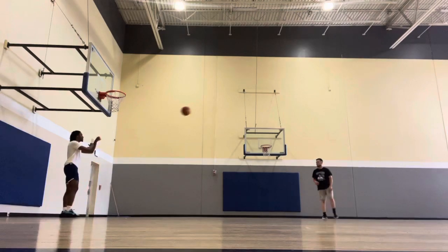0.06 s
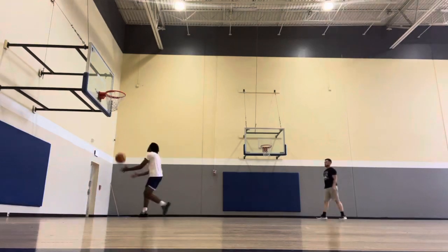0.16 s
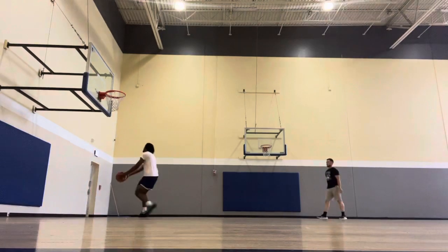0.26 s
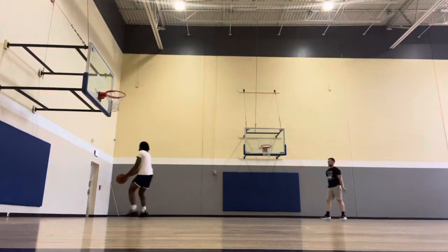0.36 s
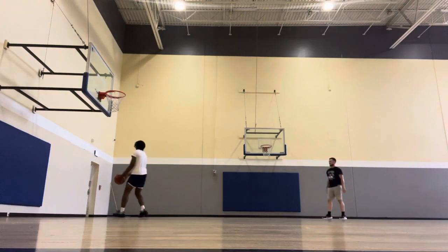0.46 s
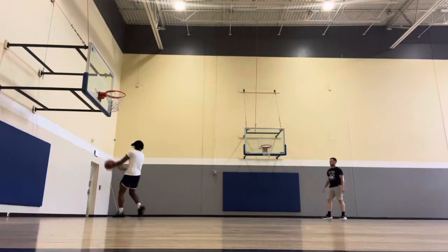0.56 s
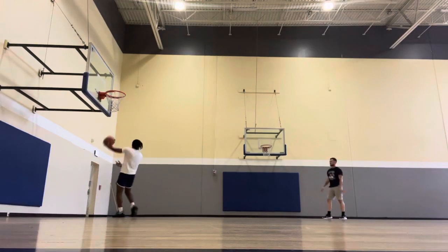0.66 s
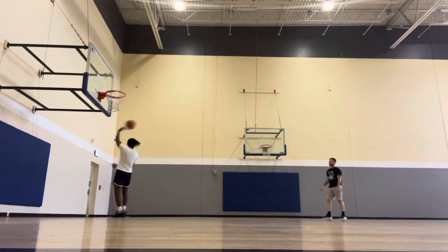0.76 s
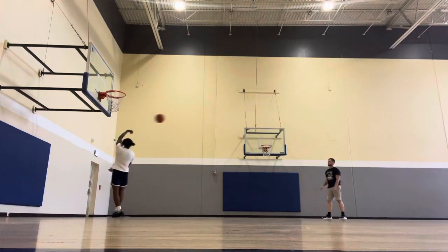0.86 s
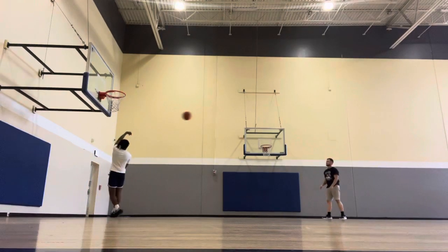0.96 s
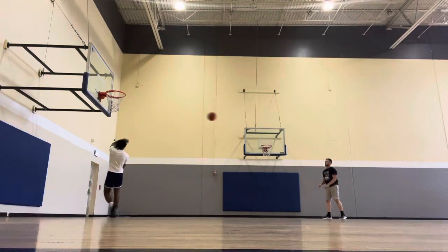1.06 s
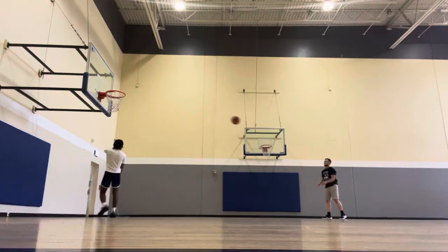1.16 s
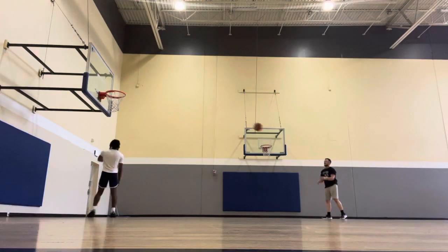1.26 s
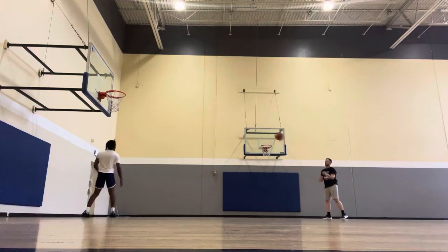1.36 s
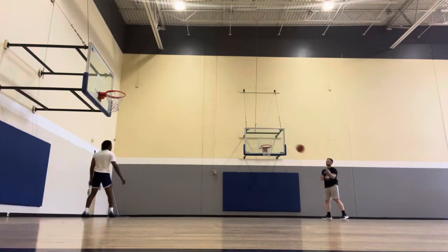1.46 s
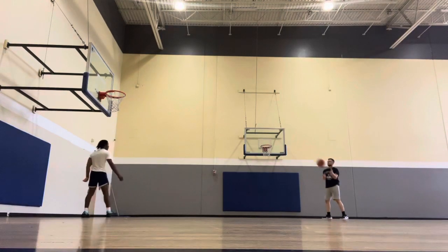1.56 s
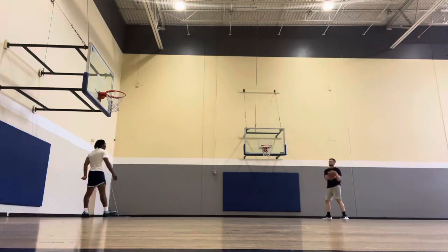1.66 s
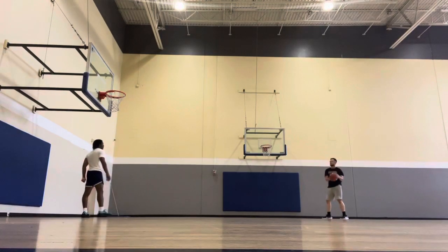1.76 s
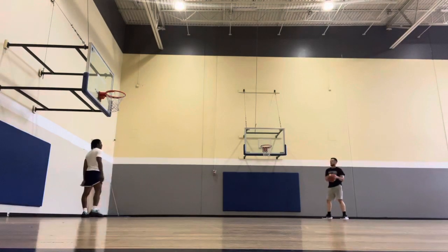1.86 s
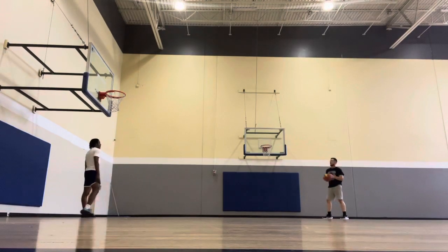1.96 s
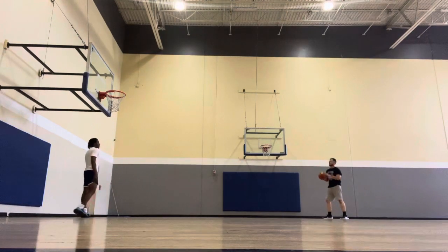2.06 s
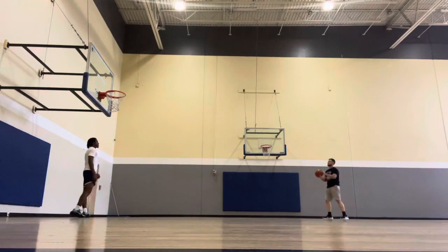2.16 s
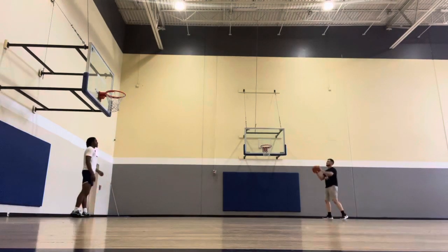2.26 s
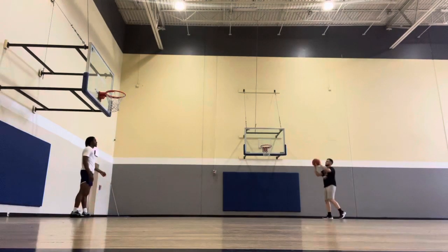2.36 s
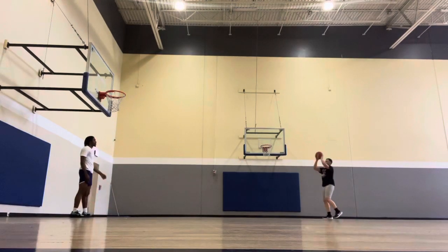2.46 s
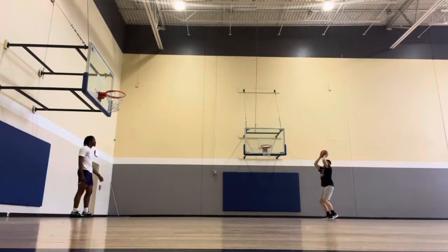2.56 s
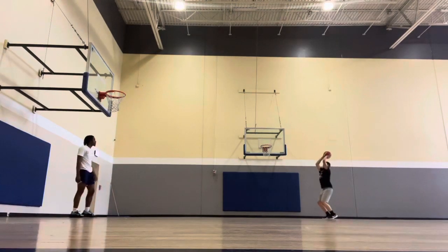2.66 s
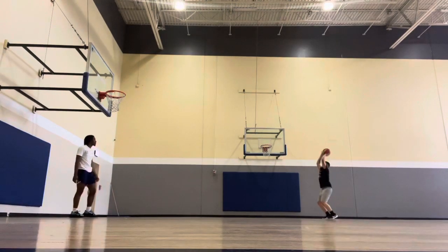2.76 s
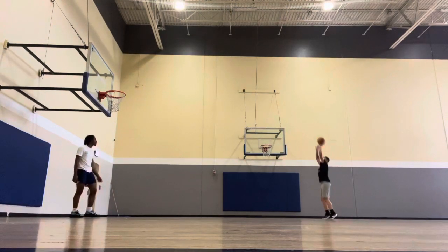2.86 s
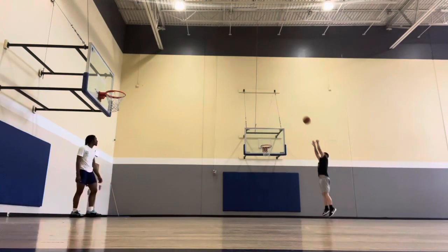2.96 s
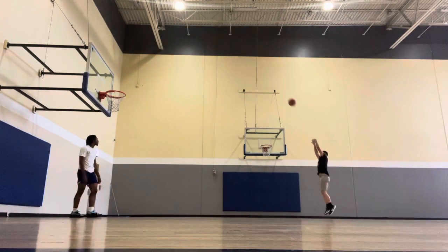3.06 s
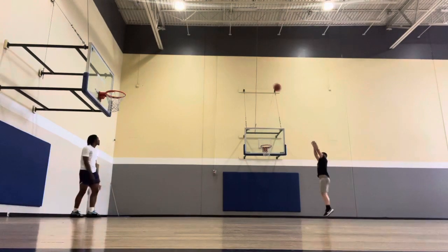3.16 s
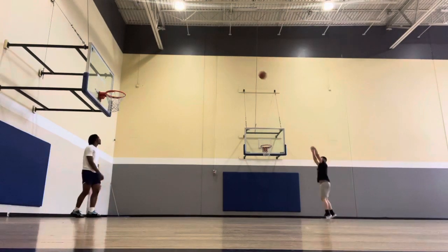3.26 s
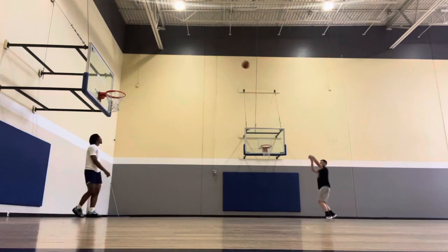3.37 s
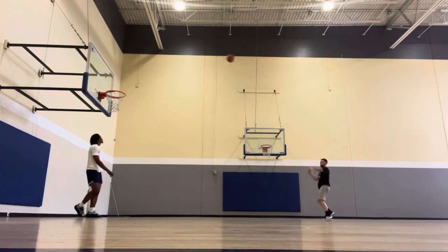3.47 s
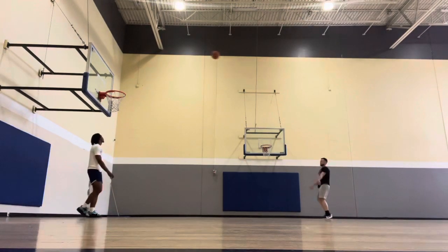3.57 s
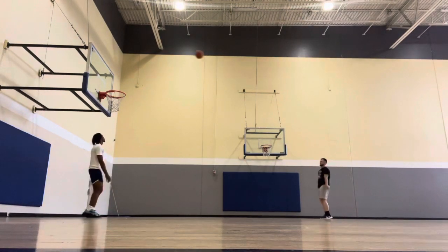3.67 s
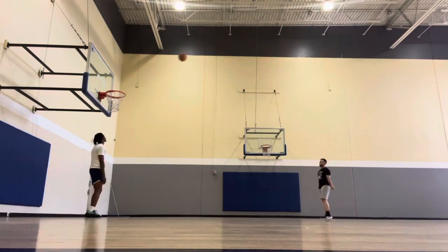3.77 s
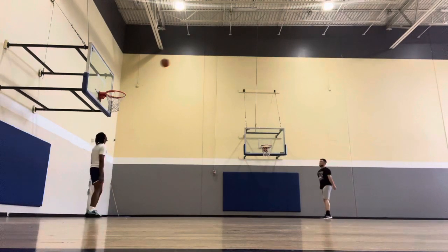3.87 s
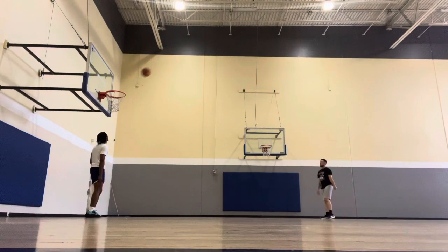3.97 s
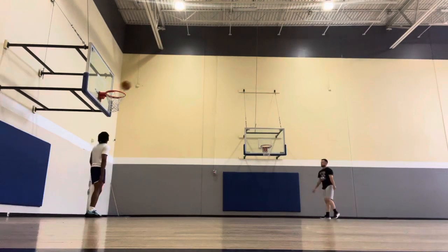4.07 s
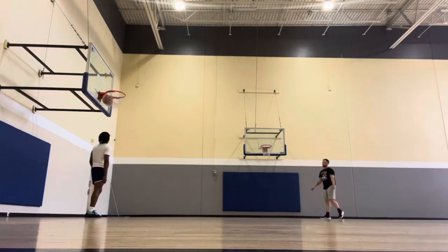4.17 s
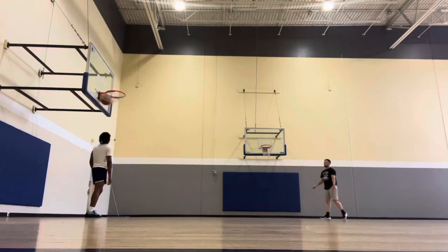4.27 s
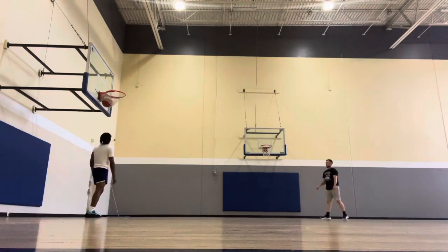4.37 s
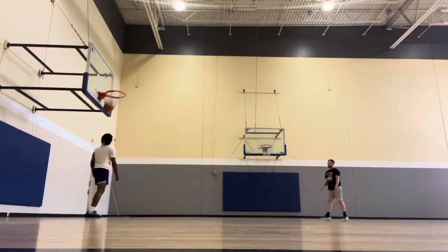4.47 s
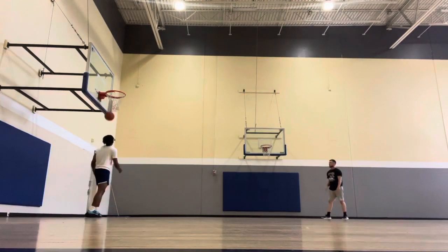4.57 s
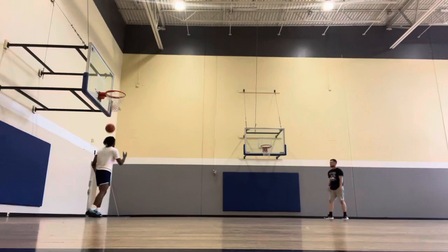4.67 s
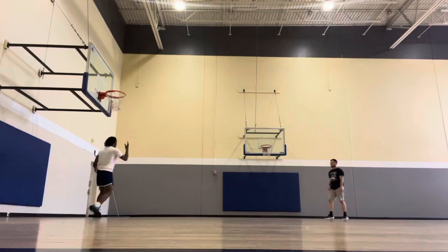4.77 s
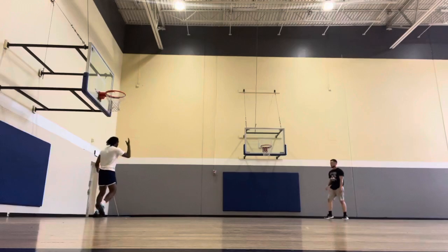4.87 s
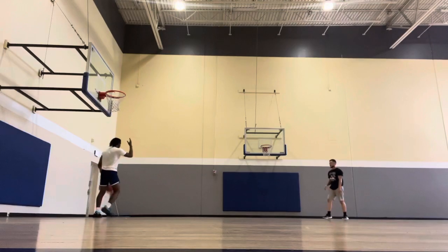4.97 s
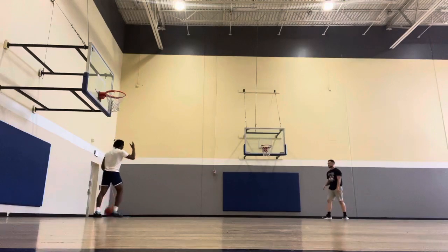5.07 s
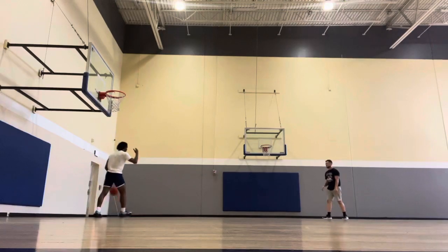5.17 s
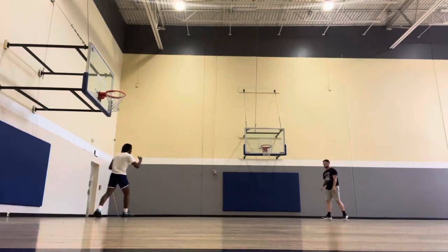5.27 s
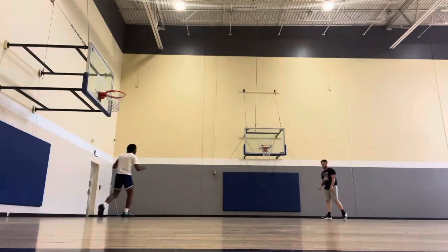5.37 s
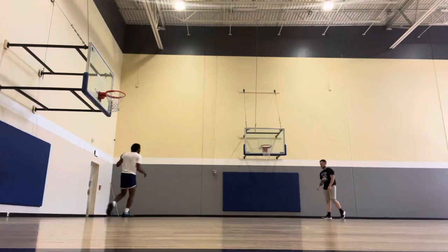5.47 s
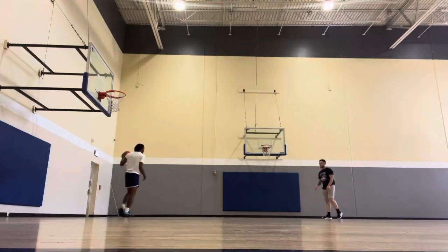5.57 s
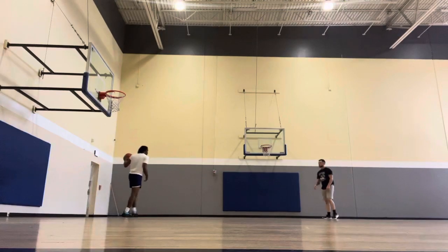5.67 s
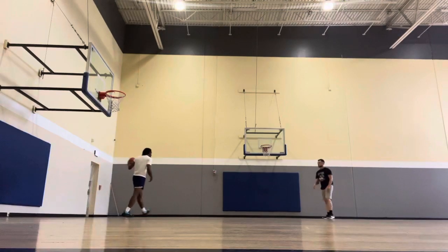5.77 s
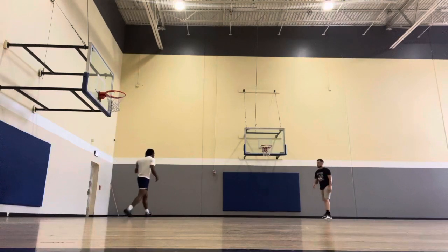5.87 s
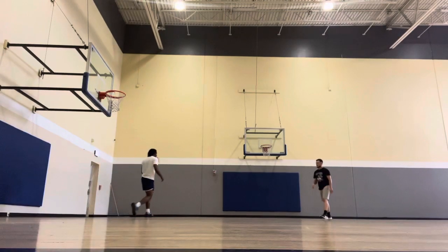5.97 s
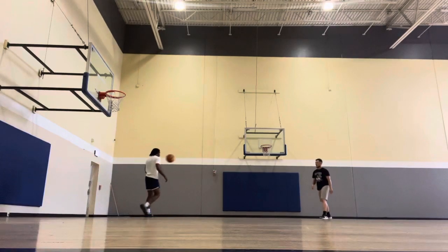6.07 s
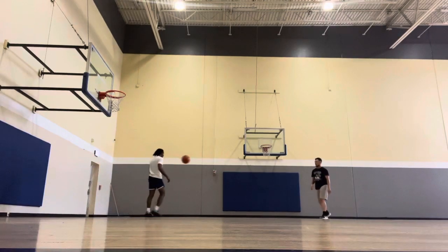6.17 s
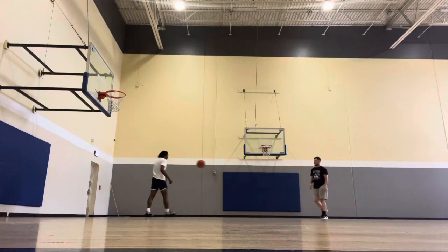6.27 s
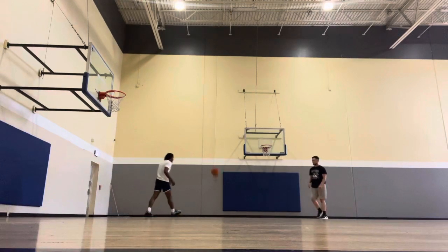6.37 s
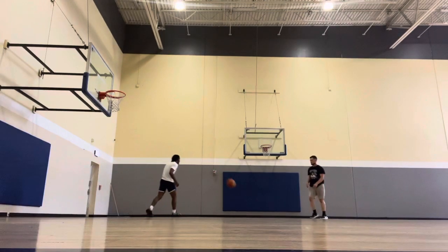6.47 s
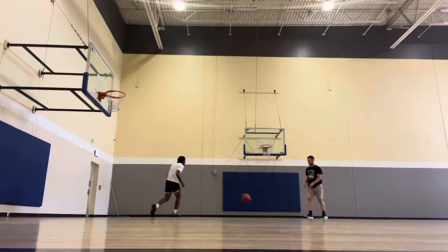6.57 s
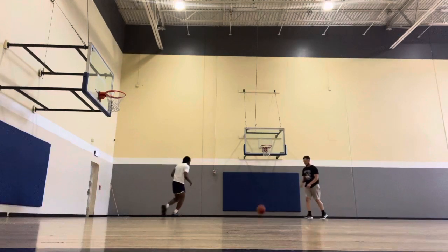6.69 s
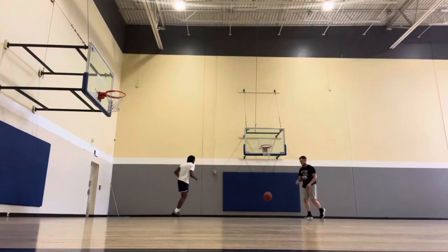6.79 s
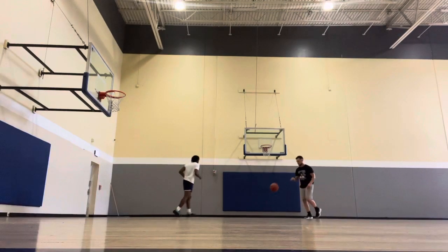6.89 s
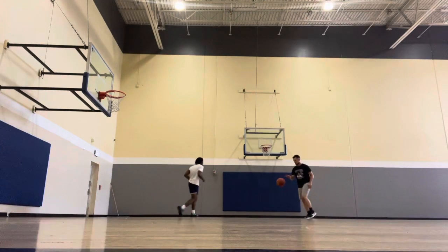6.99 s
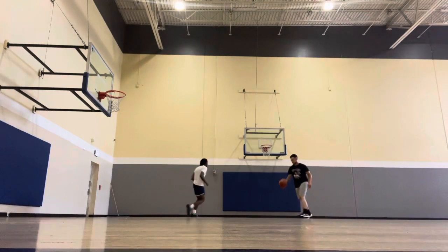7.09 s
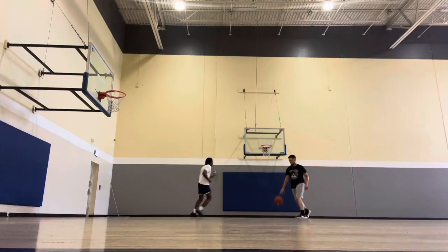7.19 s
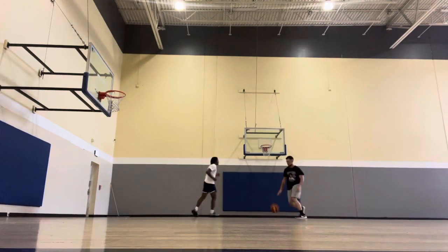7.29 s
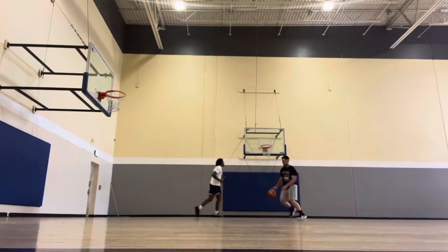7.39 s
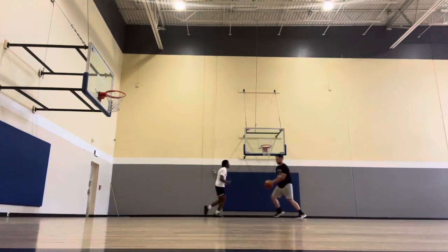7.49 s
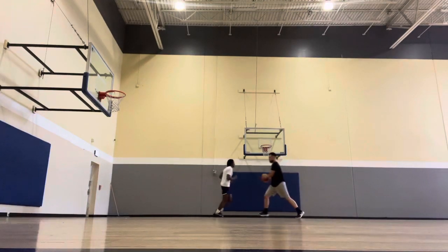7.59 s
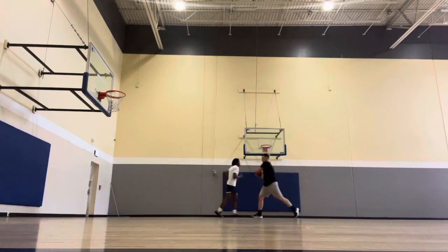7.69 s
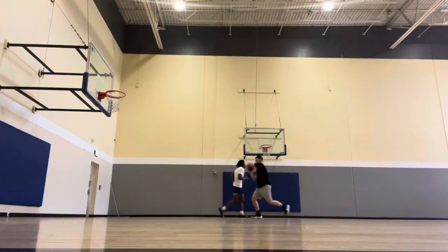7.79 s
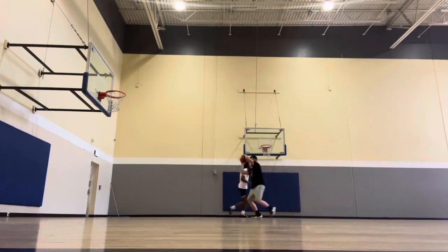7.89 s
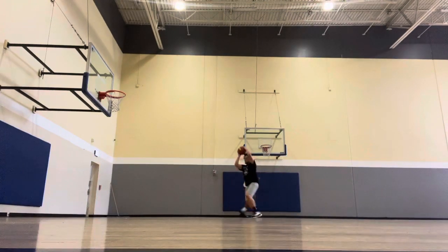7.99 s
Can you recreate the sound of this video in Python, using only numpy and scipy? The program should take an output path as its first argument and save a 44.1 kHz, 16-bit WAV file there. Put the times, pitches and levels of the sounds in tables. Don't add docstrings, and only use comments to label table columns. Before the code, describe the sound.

A huge hard-walled gym with steady low ventilation rumble, heard in stereo from floor level. An earlier bounce is still ringing; at about 0.18 s the sound briefly dips and changes, followed by a hard step at 0.25. Soft steps come at 0.9 and 1.3, then a hollow slap of ball into hands at 1.64. At 2.27-2.6 the ball strikes the steel rim hard, rings and rattles. A step at 3.26 precedes a heavy floor thud at 3.47 with a side-wall echo. A gentler hoop contact at 4.18 becomes a short shuddering net and rim drag, then a ringing drop at 4.55. The loudest dribble lands at 5.1, with deep boom and far-wall echo. Steps at 5.45, 6.08, 6.55, 7.09 and 7.7 surround sharp dribbles at 6.7 and 7.3. Midrange tails linger for seconds while treble fades quickly.

```python
import sys
import numpy as np
from scipy import signal
from scipy.fft import rfft, irfft, next_fast_len
from scipy.io import wavfile
from scipy.ndimage import uniform_filter1d

SR = 44100
rng = np.random.default_rng(int(sys.argv[2]) if len(sys.argv) > 2 else 0)


def voltage_ratio(level):
    return 10 ** (np.asarray(level, float) / 20)


def store_pcm(level_fs):
    pcm = np.round(np.clip(level_fs, -1, 1) * 32767).astype(np.int16)
    wavfile.write(sys.argv[1], SR, np.atleast_2d(pcm).T)


N = 354563
HOP = 32
SIZE = next_fast_len(N)
HZ = np.maximum(np.arange(SIZE // 2 + 1) * SR / SIZE, 1)
CHANGE_S = 0.1774


def along(table, hz, index=1):
    table = np.array(table, float)
    return np.interp(np.log(hz), np.log(np.maximum(table[:, 0], 1)), table[:, index])


# (frequency [Hz], level [dB])
PORT_DIFFERENCE = [(60, -17.5), (110, -13.5), (200, -8), (360, -4), (660, 1), (1190, 0.9), (2170, 0),
                   (5000, -0.5), (6900, 4), (8300, 5), (9600, 1), (10300, -7.5), (10600, -30), (12900, -37),
                   (13300, 1), (14200, 5), (15800, -8)]
# (frequency [Hz], level [dB])
PORT_SUM = [(6800, 0), (7650, -4), (8050, -15), (8750, -15), (9050, -1), (13500, 0), (14200, -19)]


def wide_noise(colour_db):
    white = rfft(rng.standard_normal((2, SIZE))) * np.sqrt(SR / 2)
    ports_db = np.array([along(PORT_SUM, HZ), along(PORT_DIFFERENCE, HZ)])
    return white * voltage_ratio(colour_db + ports_db)


# (frequency [Hz], level [dB per Hz])
VENT = [(16, -24.5), (28, -1), (92, 3), (402, -12), (1160, -26.5), (1460, -33.5), (5470, -52), (8070, -67),
        (9420, -58), (13500, -62.5)]


def vent():
    level_db, swell_db = -31.5, 1.8
    x = irfft(wide_noise(along(VENT, HZ)), SIZE)[:, :N]
    held = np.repeat(rng.standard_normal(N // 8192 + 1), 8192)[:N]
    swell = uniform_filter1d(held, size=8192)
    return x * voltage_ratio(level_db + swell_db * swell) / x[0].std()


# (thump, slap, ball ring, crack, top) [dB]
BOUNCE, FAR_WALL = (-0.5, -11, -18.5, -20, -40), (-1, -20, -22, -30.5, -41)
STEP_ON_BOARDS, STEEL = (-2, -6.5, -17, -20.5, -39.5), (-7.5, 0, -2.5, -15.5, -32)
CATCH = (-11.5, -1, -16.5, -24, -31.5)
FAR_WALL_S, SIDE_WALL_S, BOOM_LAG_S = .153, 0.049, .047


def coloured(rows, colour, late_s=0):
    ranges = np.arange(len(colour))
    out = []
    for s, db, hard, ring in rows:
        range_db = db + np.array(colour) + hard * ranges + ring * (ranges == 2)
        out.append((s + late_s, *range_db))
    return out


# (time [s], level [dB], hardness [dB per range], ball ring [dB])
SECOND_TAIL = [
    (.178, -23.5, -2.5, 0),
]
RIM_HITS = [
    (2.266, -22.5, -0.5, -4),
    (2.291, -13.5, 0.9, -7.5),
    (2.324, -15.5, -2.5, 9.5),
    (2.465, -24.5, 2.5, -1),
    (2.62, -28, -7, 6),
    (4.184, -25.5, 0.05, 2),
    (4.259, -25.5, 0.9, 0),
]
STEPS = [
    (.249, -25.5, 1.5, -2.5),
    (.909, -28.5, -2, 3),
    (1.299, -26.5, -2.5, -3),
    (3.264, -24, -1.8, -1),
    (5.449, -22, 2.9, 2),
    (6.078, -24.5, 1.17, 8.5),
    (6.293, -33, 0, -6),
    (6.549, -24, 0.8, -3),
    (7.086, -22, 1.6, 4),
    (7.699, -24, -1, 3),
]
CATCHES = [
    (1.642, -19, 0, 0),
]
DROPS = [
    (3.468, -9, 1.27, 0),
    (4.552, -16.5, 1, 7),
]
# (time [s], level [dB], board pitch [Hz], tick [dB], ball ring [dB])
DRIBBLES = [
    (5.103, -10, 80, -22.5, 1),
    (6.6988, -12, 111.6, -20, -3.5),
    (7.2934, -12, 114.5, -19, 0),
]


def blows():
    dribbles = [(s, db, 0, ring_db) for s, db, _, _, ring_db in DRIBBLES]
    struck = coloured(SECOND_TAIL + RIM_HITS, STEEL) + coloured(STEPS, STEP_ON_BOARDS)
    struck += coloured(CATCHES, CATCH) + coloured(dribbles + DROPS, BOUNCE)
    return struck + coloured(DROPS, BOUNCE, SIDE_WALL_S) + coloured(dribbles, FAR_WALL, FAR_WALL_S)


# (time [s], pitch [Hz], width [octaves], level [dB])
NOTES = [(1.67, 364, 0.17, -26), (1.646, 987, 0.052, -28.5), (2.268, 2400, 0.43, -31.5),
         (2.327, 70, 0.34, -14.5), (3.5, 2200, .25, -33.5), (3.9, 710, 0.39, -30), (4.10, 145, 0.14, -26),
         (4.3, 65, 0.2, -30), (4.30, 420, 0.14, -21.5), (4.60, 169, 0.11, -22), (5.15, 1927, 0.05, -24),
         (5.45, 148, 0.26, -19.5), (6.10, 146, 0.11, -17.5), (6.7, 149, 0.2, -27)]


def notes():
    floor_hz, octaves, floor_db = 79, 0.1, -9
    floor = [(s + BOOM_LAG_S, floor_hz, octaves, db + floor_db) for s, db, *_ in DRIBBLES]
    return NOTES + floor


def lag(x, seconds):
    keep = np.exp(-HOP / SR / max(seconds, 1e-3))
    return signal.lfilter([1 - keep], [1, -keep], x)


def fade(x, t60):
    return signal.lfilter([1], [1, -10 ** (-6 * HOP / SR / max(t60, .05))], x)


# (time [s], level [dB], hardness [dB per range], ball ring [dB])
FIRST_TAIL = [
    (0, -16, -1.1, -5),
]
# (low edge [Hz], high edge [Hz])
BLOW_BANDS = [(60, 160), (250, 500), (700, 1300), (2000, 5000), (9000, 13000)]
# (frequency [Hz], level [dB per Hz])
HALL = [(16, -39), (28, -36.5), (69, -1.5), (119, 1), (185, -10), (302, -11.5), (335, -15), (1160, -11),
        (1390, -19.5), (2460, -32), (2940, -39), (6070, -48.5), (8490, -50), (11600, -52), (13500, -60.5)]
# (frequency [Hz], width [Hz], level [dB])
CAVITY = [(1000, 230, -0.5), (1247, 85, 3), (1390, 490, -1.5)]
# (frequency [Hz], late t60 [s], early t60 [s], early share [dB], build-up [s])
DECAY = [(50, 4.1, 0.56, 14.5, 0.085), (120, 3.16, 0.12, -1, 0.028), (350, 5.04, 0.96, -2, 0.016),
         (1040, 6.7, 0.82, -8.5, 0.016), (2500, 6.7, 0.3, -5, 0.0078), (4900, 3.72, .7, -19, 0.018),
         (8800, 1.22, .5, -12, 0.008), (14000, 0.72, .4, -26, .015)]


def hall():
    cavity_db = sum(db / (1 + (2 * (HZ - hz) / w) ** 2) for hz, w, db in CAVITY)
    colour_db = along(HALL, HZ) + cavity_db
    noise, out = wide_noise(colour_db), 0
    before, after = np.array(coloured(FIRST_TAIL, BOUNCE)), np.array(blows())
    power = voltage_ratio(2 * colour_db)
    plain_db = [10 * np.log10(np.sum(power[(HZ > a) & (HZ < b)]) * SR / SIZE) for a, b in BLOW_BANDS]
    centres = np.log(np.sqrt(np.prod(BLOW_BANDS, axis=1)))
    steps = np.arange(N // HOP + 2)
    for hz in 28 * 2 ** (np.arange(38) / 4):
        late, early, share_db, rise = (along(DECAY, hz, index=k) for k in range(1, 5))
        bass_loss_db = 3.3 * max(np.log2(100 / hz), 0)
        sides = []
        for rows in (before, after):
            feed = np.zeros(len(steps))
            db = np.array([np.interp(np.log(hz), centres, row[1:] - plain_db) for row in rows])
            np.add.at(feed, (rows[:, 0] * SR / HOP).astype(int), voltage_ratio(2 * (db - bass_loss_db) - 17.0))
            for s, note_hz, octaves, note_db in notes() * (rows is after):
                bump = np.exp(-.5 * (np.log2(hz / note_hz) / octaves) ** 2) / (note_hz * octaves)
                feed[int(s * SR / HOP)] += bump * voltage_ratio(2 * (note_db - 10.5 - along(HALL, hz)))
            stored = fade(feed, late) + voltage_ratio(2 * share_db) * fade(feed, early)
            sides.append(lag(stored, rise))
        energy = np.where(steps * HOP / SR < CHANGE_S, *sides)
        swell = np.interp(np.arange(N) / HOP, steps, np.sqrt(energy))
        part = np.cos(np.pi / 2 * np.clip(4 * np.log2(HZ / hz), -1, 1))
        out = out + irfft(noise * part, SIZE)[:, :N] * swell
    return out


# (frequency [Hz], width [Hz], level [dB])
HOOP = [(430, 38, -8), (820, 69, -5), (1030, 42, -1), (1900, 38, -18)]


def hoop():
    start_s, length_s, level_db = 4.205, 0.17, -22.5
    gain = sum(voltage_ratio(db) / (1 + (2 * (HZ - hz) / (3.5 * w)) ** 2) for hz, w, db in HOOP)
    x = irfft(rfft(rng.standard_normal((2, SIZE))) * gain, SIZE)[:, :N]
    part = np.clip((np.arange(N) / SR - start_s) / length_s, 0, 1)
    return voltage_ratio(level_db + 3.5) * x / x.std() * np.sin(np.pi * part ** 0.8) ** .8


def snap(t, low_hz, high_hz, t60, click):
    burst = (.22 * rng.standard_normal(len(t)) + click * (t == 0)) * 1000. ** (-t / t60)
    band = signal.butter(3, [low_hz, high_hz], "bandpass", fs=SR, output="sos")
    x = signal.sosfilt(band, burst)
    return x / np.abs(x).max()


def ticks(rows, smear, click, far_db):
    out, t = np.zeros((2, N + SR)), np.arange(4096) / SR
    for s, crack_db, top_db, slap_db, pan_db in rows:
        x = voltage_ratio(crack_db - 4) * snap(t, 2500, 7250, 0.013 * smear, click)
        x = x + voltage_ratio(top_db + 6.5) * snap(t, 9700, 13300, .006 * smear, click)
        x = x + voltage_ratio(slap_db + 1.5) * snap(t, 700, 3300, .012 * smear, click)
        start = int((s + .0004) * SR)
        pan = np.array([[pan_db], [-pan_db]]) / 2
        out[:, start:start + len(t)] += voltage_ratio(far_db + pan) * x
    return out[:, :N]


# (time [s], level
# [dB], hardness [dB])
FAR_TICKS = [
    (2.291, -26.5, 5),
    (2.3844, -26.5, 2),
    (2.4652, -25, 5),
    (2.475, -24.5, 4.5),
    (2.6284, -24.5, -3),
    (4.1835, -31, -6),
    (4.2594, -33, -5),
]


def far_ticks():
    top_db = -26
    rows = [(s, db + hard, db + top_db + hard / 2, db, 0) for s, db, hard in FAR_TICKS]
    return ticks(rows, smear=6.6, click=0, far_db=-1)


# (near wall [s], side wall [s])
WALL_LAGS = [(.0074, .0442), (.0142, .0394), (.0166, .0389)]
# (time [s], pitch [Hz], peak level [dB], t60 [s])
KNOCKS = [(.262, 2400, -34.5, .02), (1.647, 350, -15, 0.056), (1.647, 1030, -17.5, 0.022),
          (1.682, 1060, -21, 0.045), (1.683, 397, -20, 0.053), (1.684, 1640, -29, 0.022),
          (1.752, 381, -17, 0.072), (2.327, 93, -5, 0.31), (3.475, 105.7, -11, .2),
          (3.512, 104.8, -4.5, 0.28), (3.672, 137, -5, 0.21), (4.553, 5260, -26, 0.0067),
          (4.603, 145, -9, 0.072), (4.700, 120, -14, 0.2), (4.775, 120, -13, 0.25),
          (5.506, 98, -7.5, 0.071), (7.305, 112, -4, 0.04), (7.407, 96, -13, 0.13), (7.509, 109, -8, 0.094)]


def rings():
    boards, ball_air, ball_skin = (141, 0.75, .085), (1120, -10, .04), (2030, -9, .015)
    side_boom, far_boom = (0.76, 1.6, 0.14), (1.08, 1.5, 0.26)
    rows = list(KNOCKS)
    for (s, db, board_hz, *_), (near_s, _) in zip(DRIBBLES, WALL_LAGS):
        shared = ((0, 1, boards), (0, 1, ball_air), (near_s, 1, ball_skin),
                  (BOOM_LAG_S, board_hz, side_boom), (FAR_WALL_S, board_hz, far_boom))
        for lag_s, unit_hz, (hz, ring_db, t60) in shared:
            rows.append((s + lag_s, hz * unit_hz, db + ring_db, t60))
    return rows


def knocks():
    out, t = np.zeros(N + SR), np.arange(SR // 2) / SR
    for s, hz, db, t60 in rings():
        x = np.sin(2 * np.pi * hz * t) * 1000. ** (-t / t60) * (1 - np.exp(-4 * hz * t))
        start = int(s * SR)
        out[start:start + len(t)] += voltage_ratio(db) * x / np.abs(x).max()
    return out[:N] * voltage_ratio(np.array([[1.5], [-1.5]]))


# (crack, top, slap) [dB]
STRAIGHT, OFF_NEAR_WALL, OFF_SIDE_WALL = (0, -10.5, 1), (-12, -13, -1), (-5, -21, -5)
# (time [s], level [dB], top [dB], left minus right [dB])
LONE_TICKS = [
    (.035, -35.5, 0, -3.5),
    (1.2994, -47, -2.5, -3),
    (1.6656, -44, -5, .3),
    (3.2639, -44, -4, 7),
    (3.4679, -22, -7.5, 4),
    (4.58, -32.5, -3, 4),
    (5.171, -36, -18, 1),
    (6.079, -40, -10, 5),
]
# (time [s], level [dB], top [dB], wall lag [s], left minus right [dB])
TICKS = [
    (.2516, -26.5, -4, .0094, 7),
    (1.6445, -31.5, -8, 0.0052, 6),
    (1.6833, -37, 4, .0088, 10),
    (4.5543, -25.5, -8, .0181, 8.5),
    (7.0874, -30, -4, .0158, 5),
]


def tick(s, db, top_db, pan_db, colour):
    crack, top, slap = colour
    return s, db + crack, db + top + top_db, db + slap, pan_db


def near_ticks():
    dribble_top_db, dribble_pan_db = -2, 7
    rows = [tick(*row, STRAIGHT) for row in LONE_TICKS]
    for s, db, top_db, lag_s, pan_db in TICKS:
        rows.append(tick(s, db, top_db, pan_db, STRAIGHT))
        rows.append(tick(s + lag_s, db, top_db / 2, pan_db, OFF_NEAR_WALL))
    for (s, _, _, db, _), (near_s, side_s) in zip(DRIBBLES, WALL_LAGS):
        for lag_s, colour in ((0, STRAIGHT), (near_s, OFF_NEAR_WALL), (side_s, OFF_SIDE_WALL)):
            rows.append(tick(s + lag_s, db, dribble_top_db, dribble_pan_db, colour))
    return ticks(rows, smear=0.89, click=0.9, far_db=0)


# (frequency [Hz], left minus right [dB])
LEAN = [(60, 0.8), (200, 3), (660, 2), (1190, 1), (2170, -3), (3950, 2), (6000, 8), (7200, -2)]


def scene():
    mid, side = hall() + vent()
    lean_db = along(LEAN, HZ) * np.clip((7300 - HZ) / 1000, 0, 1)
    lean = voltage_ratio(np.outer([.5, -.5], lean_db))
    diffuse = irfft(rfft(np.array([mid + side, mid - side]), SIZE) * lean, SIZE)[:, :N]
    contacts = near_ticks() + far_ticks()
    return diffuse + contacts + knocks() + hoop()


def roll_off(x):
    return signal.sosfilt(signal.butter(12, 15800, fs=SR, output="sos"), x)


def record(dry):
    fade_out_s, fade_in_s = 0.024, 0.035
    since = np.arange(N) / SR - CHANGE_S
    dip = np.clip(np.maximum(-since / fade_out_s, since / fade_in_s), .03, 1)
    heard = signal.sosfilt(signal.butter(3, 41, "highpass", fs=SR, output="sos"), dry) * dip
    mix = np.tanh(0.68 * heard) / 0.72
    return roll_off(mix)


dry = scene()
out = record(dry)
store_pcm(out)
```